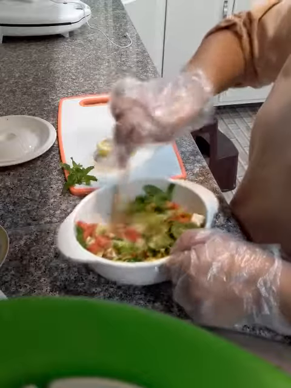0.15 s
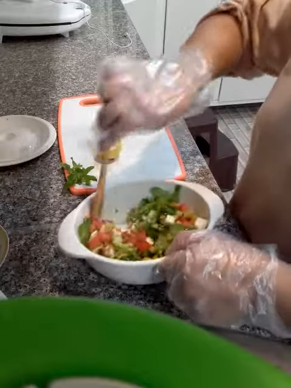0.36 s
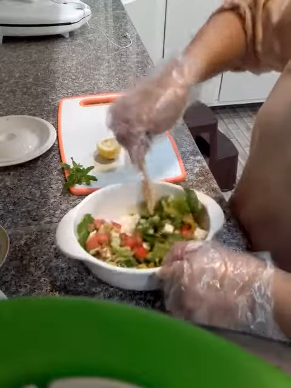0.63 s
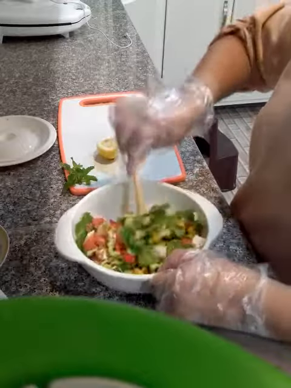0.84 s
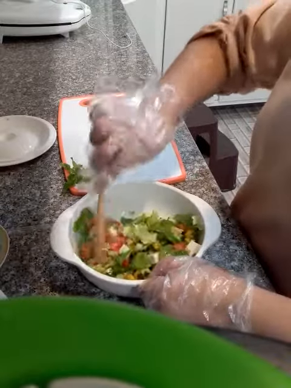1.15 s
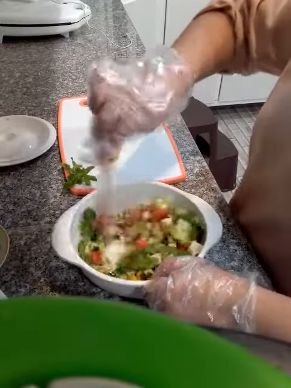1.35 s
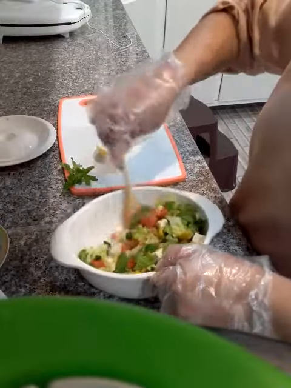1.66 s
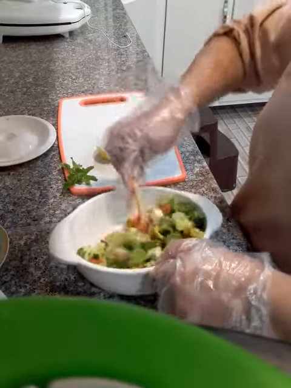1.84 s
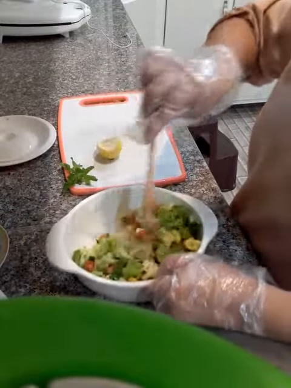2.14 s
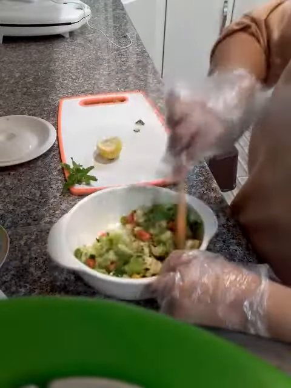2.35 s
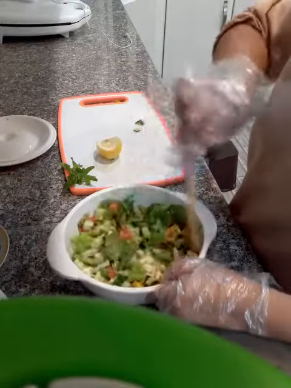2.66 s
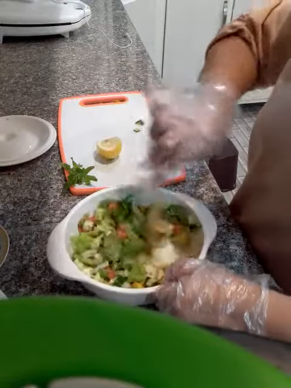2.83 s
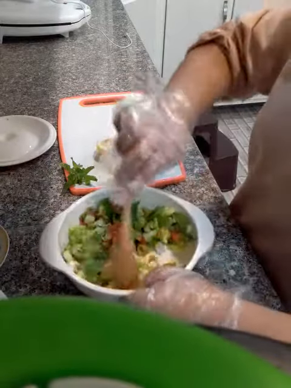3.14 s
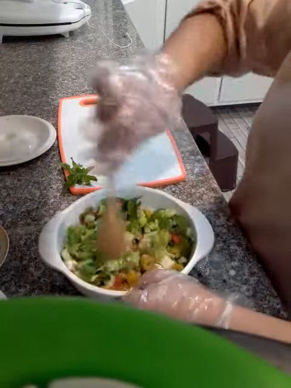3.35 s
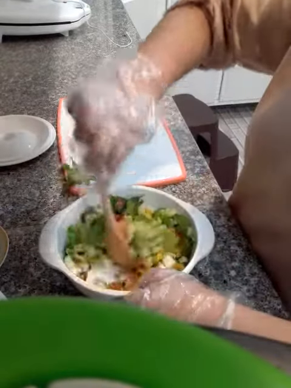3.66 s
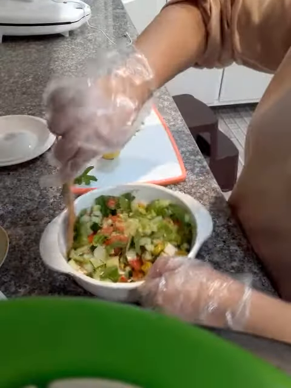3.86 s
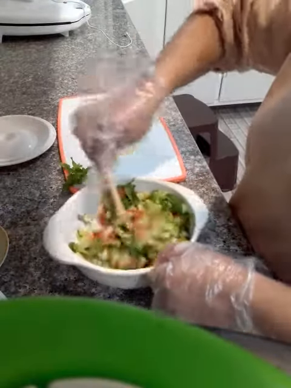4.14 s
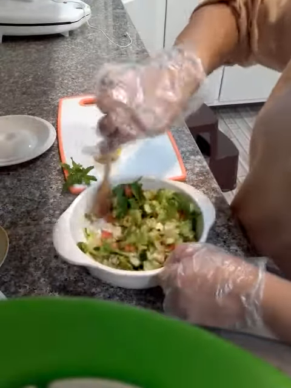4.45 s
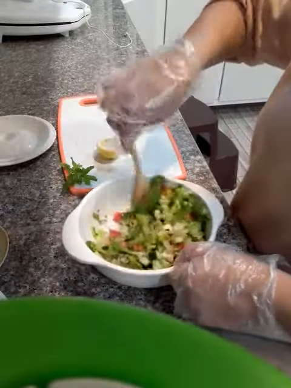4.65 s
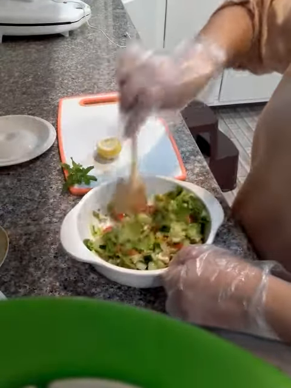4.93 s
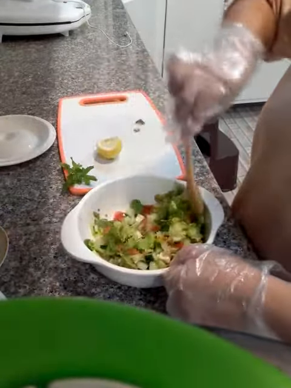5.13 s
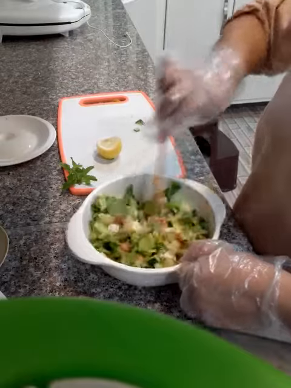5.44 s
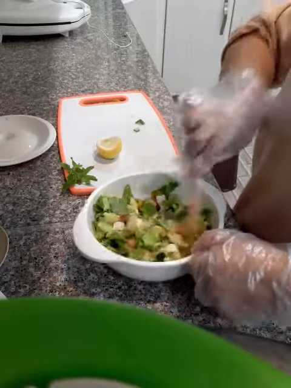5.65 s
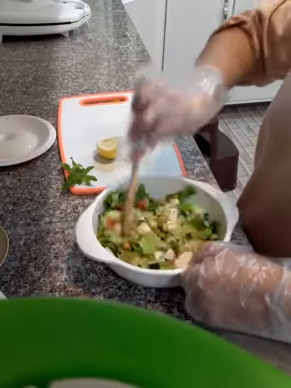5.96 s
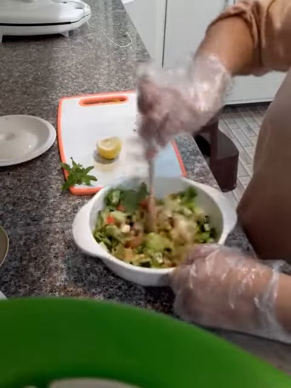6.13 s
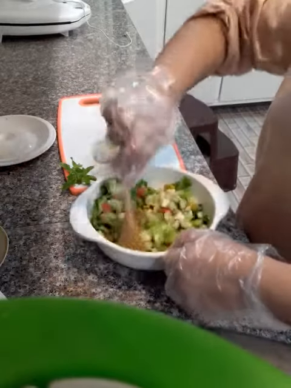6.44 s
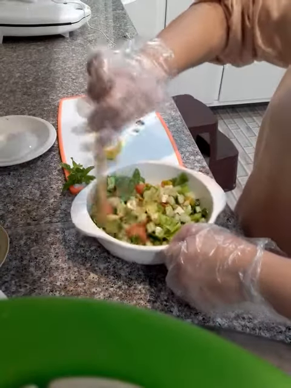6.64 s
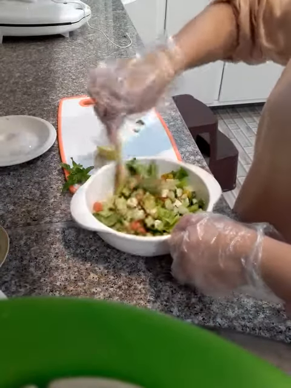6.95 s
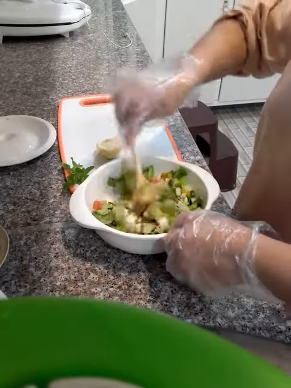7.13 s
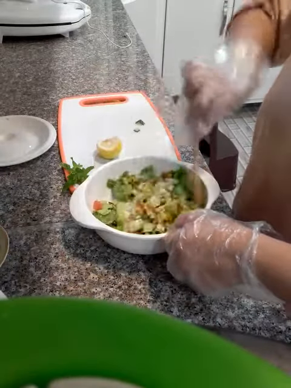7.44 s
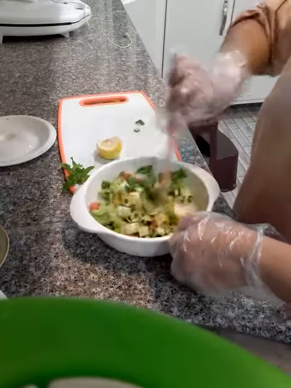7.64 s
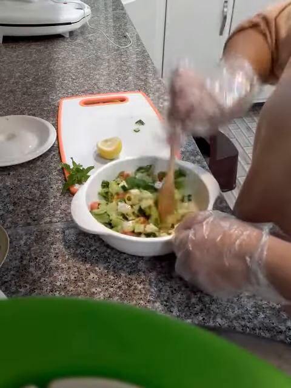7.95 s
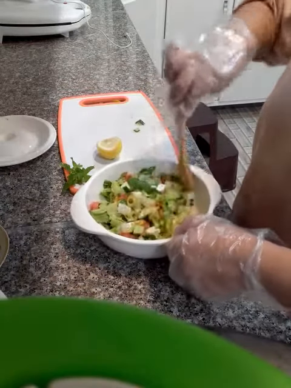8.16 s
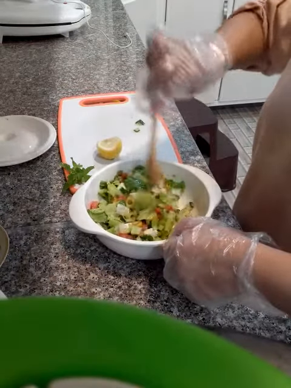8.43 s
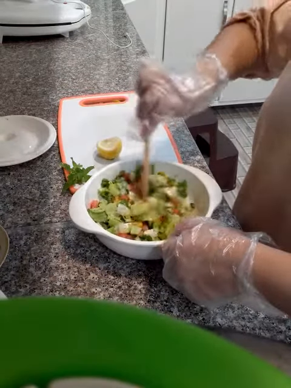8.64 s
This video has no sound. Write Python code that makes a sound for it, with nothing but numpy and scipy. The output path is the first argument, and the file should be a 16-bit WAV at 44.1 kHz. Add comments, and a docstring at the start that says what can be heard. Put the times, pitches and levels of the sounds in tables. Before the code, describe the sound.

Close up in a quiet, lightly reverberant kitchen, a wooden spoon tosses wet salad in a bowl. Short uneven strokes bring damp leaf crackle and low rubbing along the bottom, often beginning with a hard woody clack on the bare wall. Duller knocks come through the salad, clustering around two and a half seconds and near six and eight. Thin plastic gloves snap, and the bowl occasionally booms softly on the counter.

```python
"""Tossing salad in a bowl

A wooden spoon tosses dressed salad in a bowl on a stone kitchen counter. It clacks on the bare wall,
knocks dully through the salad (noise cracks plus decaying bowl modes) and rubs along the bottom (clumped
grains). Wet leaves and plastic gloves crackle and snap (shaped noise), wet wood sings along the wall
(narrow noise), the bowl booms on the counter, and a decaying noise tail makes the room answer."""
import sys
import numpy as np
from scipy import signal
from scipy.fft import rfft, irfft, next_fast_len
from scipy.io import wavfile
from scipy.ndimage import uniform_filter1d, map_coordinates

SR = 44100
rng = np.random.default_rng(int(sys.argv[2]) if len(sys.argv) > 2 else 0)


def store_wav(level_fs):
    """Save 16-bit WAV to argv[1]."""
    pcm = np.round(np.clip(np.atleast_2d(level_fs), -1, 1) * 32767)
    wavfile.write(sys.argv[1], SR, pcm.T.astype(np.int16))


N = 387638
BLOW_SIZE = SR * 3 // 4  # samples kept per blow, with its room tail


def amp(db):
    """Amplitude ratio of a level in dB."""
    return 10 ** (np.asarray(db) / 20)


def unit(x):
    """x at rms 1."""
    return x / np.sqrt(np.mean(x ** 2) + 1e-20)


def along(points, hz):
    """Interpolate (Hz, value) points on a log frequency axis."""
    f, v = np.transpose(points)
    return np.interp(np.log(hz + 1), np.log(f + 1), v)


def filtered(x, response):
    """x times a zero-phase response, a function of Hz."""
    m = next_fast_len(len(x) + 8192)
    spectrum = rfft(x, m) * response(np.fft.rfftfreq(m, 1 / SR))
    return irfft(spectrum, m)[:len(x)]


def coloured(x, spectrum):
    """x weighted by a (Hz, dB) spectrum, at rms 1."""
    return unit(filtered(x, lambda f: amp(along(spectrum, f))))


def bell(f, hz, width):
    """Gaussian bell on a log frequency axis; width is relative to its pitch."""
    return np.exp(-(np.log((f + 1) / hz) / width) ** 2)


def narrow(size, hz, width):
    """Noise of rms 1 in one resonance."""
    return unit(filtered(rng.standard_normal(size), lambda f: bell(f, hz, width)))


def favoured(blow, hz, boost_db, width):
    """The place of contact drives the modes around one pitch harder than the rest."""
    return filtered(blow, lambda f: amp(boost_db * bell(f, hz, width)))


def add(track, s, sound):
    """Mix a sound in at s seconds."""
    part = track[max(round(s * SR), 0):][:len(sound)]
    part += sound[:len(part)]


def wobble(rate):
    """A smooth random curve, rate knots a second."""
    knots = rng.standard_normal(int(N * rate / SR) + 4)
    return map_coordinates(knots, [np.arange(N) * rate / SR])


# Late decay of the room. Each row: frequency in Hz, t60 in s.
ROOM_DECAY = [(120, 0.38), (500, 0.24), (1000, 0.4), (2500, 0.58), (5000, 0.54), (9000, 0.35), (15000, 0.1)]


def kitchen(x, early_db, late_db, early_t60=0.17, build=0.0023):
    """Counter and cupboards answer within milliseconds, the whole room rings on; times in s."""
    hz, when, z = signal.stft(rng.standard_normal(BLOW_SIZE), SR, nperseg=256)
    decay = amp(-60 * when / along(ROOM_DECAY, hz)[:, None])
    late = signal.istft(z * decay, SR, nperseg=256)[1][:BLOW_SIZE]
    t = np.arange(BLOW_SIZE) / SR
    early = rng.standard_normal(BLOW_SIZE) * amp(-60 * t / early_t60)
    arriving = 1 - np.exp(-t / build)
    answer = amp(early_db) * unit(early * arriving) + amp(late_db) * unit(late * arriving)
    return x + signal.fftconvolve(x, answer / np.sqrt(BLOW_SIZE))[:len(x)]


# Still kitchen air. Each row: frequency in Hz, relative spectral level in dB.
AIR_SPECTRUM = [(20, 1.5), (35, -74), (60, -18), (130, 2), (220, -0.5), (400, -3), (850, 0.5), (1400, -8.5),
                (2900, -19), (11000, -21.5), (15800, -18)]


def hush():
    """Steady noise with the spectrum of the still kitchen."""
    return amp(-63.5) * coloured(rng.standard_normal(N), AIR_SPECTRUM)


def grains(rate, spread_db, clump_db, clump_rate):
    """Random tiny impulses, mostly weak, arriving in clumps; rates per second."""
    size_db = spread_db * np.minimum(rng.standard_exponential(N), 4) + clump_db * wobble(clump_rate)
    return (rng.random(N) < rate / SR) * amp(size_db) * rng.standard_normal(N)


def effort(rise, length, sag_db_per_s, fall_db_per_s, t):
    """One stroke at times t after its start: builds, sags as the salad gives way, dies as the spoon lifts."""
    sag_db = sag_db_per_s * np.maximum(t - rise, 0)
    fall_db = fall_db_per_s * np.maximum(t - length, 0)
    return np.clip(t / rise, 0, 1) * amp(-sag_db - fall_db)


# Leaves and glove film. Each row: frequency in Hz, relative spectral level in dB.
LEAF_SPECTRUM = [(500, -10), (1200, 7), (2000, 1.5), (3200, 0.5), (4600, -1), (6000, -2.5), (8000, -5),
                 (11500, -5), (15800, -13)]


def snap(hz, t60=0.022, boost_db=11, width=0.13):
    """A leaf breaks or a fold of film flips: a brief crackle around a pitch of its own."""
    t = np.arange(SR // 30) / SR
    crackle = rng.standard_normal(len(t)) * amp(2.1 * rng.standard_normal(len(t)))
    fade = amp(-60 * t / t60) * (1 - np.exp(-t / 0.00051))
    return fade * unit(favoured(coloured(crackle, LEAF_SPECTRUM), hz, boost_db, width))


FLICKS_PER_S, FLICK_HZ, FLICK_SPREAD_DB = 40, 7000, 7.5


def flicks():
    """Many small snaps at random times, each with its own size and pitch, up to an octave off centre."""
    track = np.zeros(N)
    for when, size, pitch in rng.uniform(-1, 1, (int(FLICKS_PER_S * N / SR), 3)):
        flick = snap(FLICK_HZ * 2 ** pitch, t60=0.014, boost_db=8.5)
        add(track, abs(when) * N / SR, amp(FLICK_SPREAD_DB * size) * flick)
    return unit(track)


# Spoon on the bottom. Each row: frequency in Hz, relative spectral level in dB.
RUB_SPECTRUM = [(50, -97), (90, -9), (135, 0.5), (220, -2), (320, 3.5), (450, 0), (620, 6), (900, 6),
                (1150, -4.5), (1400, -7.5), (2200, -8), (5000, -40)]
# Strokes through the salad. Each row: start in seconds, rise in s, length in s,
# relative crackle of leaves in dB, relative rub on the bottom in dB.
STROKES = [(0.069, .02, 0.16, -60, -50.5), (0.436, 0.018, 0.56, -60, -49), (1.124, 0.16, 0.14, -60, -44),
           (1.508, 0.023, 0.56, -60.5, -53), (2.33, .17, 0.15, -63, -49), (2.466, 0.014, .22, -66, -45.5),
           (2.732, .02, 0.23, -61.5, -47.5), (3.044, 0.062, 0.19, -63.5, -55),
           (3.505, 0.018, 0.18, -63, -49.5), (3.846, 0.026, 0.45, -61, -52),
           (4.437, 0.054, 0.33, -61, -51.5), (4.876, .13, 0.15, -66, -58), (5.161, 0.11, .19, -62, -53.5),
           (5.493, 0.024, 0.054, -68.5, -60), (5.62, 0.023, 0.31, -60.5, -50),
           (5.982, 0.098, 0.16, -60.5, -49), (6.209, 0.19, 0.27, -58.5, -43.5),
           (6.705, 0.096, 0.36, -62, -53), (7.437, .01, .16, -60.5, -50), (7.788, .02, 0.54, -59.5, -54),
           (8.574, 0.057, 0.11, -69.5, -65.5)]
CRACKLE_SAG_DB_PER_S, CRACKLE_FALL_DB_PER_S = 15.5, 113  # leaves give way during a stroke, then settle
RUB_SAG_DB_PER_S, RUB_FALL_DB_PER_S = 6.5, 88  # the pressure eases, then the spoon lifts
IDLE_CRACKLE_DB, IDLE_RUB_DB = -80, -76.5  # between strokes, on the scale of STROKES


def stirring():
    """With each stroke the spoon slips along the bottom; wet leaves and glove film crackle and flick."""
    press_power, toss_power, t = np.zeros(N), np.zeros(N), np.arange(SR) / SR
    for s, rise, length, crackle_db, rub_db in STROKES:
        push = effort(rise, length, RUB_SAG_DB_PER_S, RUB_FALL_DB_PER_S, t)
        stir = effort(rise, length, CRACKLE_SAG_DB_PER_S, CRACKLE_FALL_DB_PER_S, t)
        add(press_power, s, (amp(rub_db) * push) ** 2)
        add(toss_power, s, (amp(crackle_db) * stir) ** 2)
    press = np.hypot(np.sqrt(press_power), amp(IDLE_RUB_DB))
    toss = np.hypot(np.sqrt(toss_power), amp(IDLE_CRACKLE_DB))
    slips = grains(rate=1200, spread_db=1.5, clump_db=3.0, clump_rate=82)
    rub = amp(-7.5) * press * coloured(slips, RUB_SPECTRUM)
    crackle = grains(rate=2500, spread_db=4, clump_db=3.2, clump_rate=160)
    leaves = toss * (amp(3.0) * coloured(crackle, LEAF_SPECTRUM) + amp(-1) * flicks())
    return kitchen(rub + leaves, early_db=-2, late_db=-7.5, early_t60=0.18)


# Modes of the loaded bowl. Each row: nominal frequency in Hz, nominal level in dB, undamped t60 in s.
BOWL_MODES = [(139, -20, 0.11), (242, -17, 0.042), (305, -11.5, 0.12), (423.5, -13, 0.073),
              (572.7, -9, 0.12), (614.4, -4.5, 0.13), (674, -25.5, 0.011), (851.2, 9, 0.041),
              (909, 5, 0.072), (995, 12, 0.017), (1069.6, 1.5, 0.075), (1130, 2.5, 0.036),
              (1491, 8.5, 0.036), (1636, -0.5, 0.066), (1782, 1, 0.039), (1940, 10, 0.015),
              (1999, -17, 0.17), (2448, -13.5, 0.029), (2560, 20, 0.0072), (2800, -31, 0.064),
              (3450, -4.5, 0.017), (3683, -8, 0.063), (4596, 6, 0.0076), (5210, -3, 0.012),
              (5940, -61, 0.024), (6860, -14, 0.026)]
# Crack of wood on the bowl. Each row: frequency in Hz, relative spectral level in dB.
CRACK_SPECTRUM = [(60, -18), (250, -29), (600, 14.5), (1000, 1.5), (2200, 7.5), (3800, 0), (5100, -4),
                  (6200, -4.5), (7600, -10), (9500, -23.5), (16000, -34)]


def strike(crack_db, crack_t60, attack, damping, shift=0.0082):
    """One blow: a noise crack and the bowl's modes, each a little off in pitch and level by chance."""
    t = np.arange(SR // 10) / SR
    hz, db, t60 = np.transpose(BOWL_MODES)[:, :, None]
    hz = hz * (1 + shift * rng.standard_normal(hz.shape))
    db = db + rng.normal(0, 1.5, hz.shape)
    phase = rng.uniform(0, 2 * np.pi, hz.shape)
    modes = np.sum(amp(db - 60 * damping * t / t60) * np.sin(2 * np.pi * hz * t + phase), axis=0)
    crack = coloured(rng.standard_normal(len(t)), CRACK_SPECTRUM) * amp(crack_db - 60 * t / crack_t60)
    onset = 1 - np.exp(-(t / attack) ** 2)
    return np.pad((modes + crack) * onset, (0, BLOW_SIZE - len(t)))


# Valleys between the bowl's resonances. Each row: frequency in Hz, gain in dB.
VALLEYS = [(240, -17), (485, -5), (750, -9.5), (1330, -2), (3150, 0), (4250, -5), (5100, -7)]


def hollowed(blow, width=.055):
    """The bowl radiates little between its resonances."""
    return filtered(blow, lambda f: amp(sum(db * bell(f, hz, width) for hz, db in VALLEYS)))


def registers(base_db, per_weight, per_hardness, weight_db, hardness_db):
    """Level of each register in dB: weight mostly fills the low ones, a hard contact the high ones."""
    return np.array(base_db) + weight_db * np.array(per_weight) + hardness_db * np.array(per_hardness)


# Edges of thud, body, knock, clack and tick, in Hz.
REGISTER_EDGES_HZ = [100, 400, 750, 1300, 4000, 16000]


def voiced(blow, register_db):
    """Share the blow's strength among five registers, each levelled by its first 30 ms."""
    out = np.zeros(len(blow))
    for lo, hi, db in zip(REGISTER_EDGES_HZ, REGISTER_EDGES_HZ[1:], register_db):
        band = signal.butter(4, [lo, hi], 'band', fs=SR, output='sos')
        part = signal.sosfilt(band, blow)
        out += amp(db) * part / np.std(part[:SR // 33])
    return out


def ring(hz, t60, width, swell, head_db, head_t60):
    """A favoured mode: a decaying sine at first, then a lingering, wavering tone of narrow noise."""
    t = np.arange(BLOW_SIZE) / SR
    tone = narrow(BLOW_SIZE, hz, width)
    tone /= np.sqrt(np.abs(uniform_filter1d(tone ** 2, SR // 25)) + .1)  # even out the noise's swells
    head = amp(head_db - 60 * t / head_t60) * np.sin(2 * np.pi * hz * t)
    return (head + tone * amp(-60 * t / t60)) * (1 - np.exp(-t / swell))


# Spoon on the bare wall. Each row: start in seconds, level in dB, ring in Hz, relative ring level in dB,
# weight of salad behind the wall in dB, sharpness of the edge in dB.
TAPS = [(0.086, -25.5, 1106, -3.5, 8.5, -12), (0.459, -34.5, 1720, -18, 7.5, -16),
        (1.499, -24.5, 3400, -10.5, 1.5, -10), (2.741, -28, 880, -8, 1, -6.5),
        (3.509, -35, 2780, -16, 5, -30), (3.857, -26.5, 2007, -2, -6, -10), (4.459, -28.5, 575, -8, 5, -8),
        (5.634, -31.5, 2860, -12, -3, -15), (6.382, -27, 2780, -4.5, 2, -7.5),
        (7.442, -27, 2420, -15, -1, -5.5), (7.818, -27, 876, -8, 3.5, -7.5),
        (8.179, -29, 1414, -15, 7, -25)]
# Registers of a tap, thud to tick: base in dB, growth with weight and with edge in dB per dB.
TAP_BASE_DB = [-27.5, -15.5, -10, -1.5, -2.3]
TAP_DB_PER_WEIGHT_DB = [0.66, 1, 0.05, 0, 0.12]
TAP_DB_PER_EDGE_DB = [0, 0.13, 0.028, 0.18, 1]
RING_T60_AT_0DB_WEIGHT_S, RING_DAMPING = 0.37, 0.29  # dB of ring time lost per dB of weight
WALL_HZ = 2040  # every tap drives the bare wall harder here
MUFFLE_HZ, MUFFLE = 3570, 0.72  # weight mutes the upper modes around here, dB per dB


def taps(count=3):
    """Hard clacks: the spoon chatters on the wall, a few contacts within milliseconds, and the wall rings."""
    track = np.zeros(N)
    for s, db, ring_hz, ring_db, weight_db, edge_db in TAPS:
        chatter = np.zeros(BLOW_SIZE)
        for k in range(count):
            contact = strike(crack_db=8.0, crack_t60=0.042, attack=0.0014, damping=1.16)
            heard = kitchen(contact, early_db=-12, late_db=-6.0, early_t60=0.44)
            add(chatter, k * .0014, amp(-1.5 * k) * heard)
        chatter = favoured(chatter, ring_hz, boost_db=9.5, width=0.057)
        chatter = favoured(chatter, WALL_HZ, boost_db=2.5, width=0.074)
        chatter = favoured(chatter, MUFFLE_HZ, -MUFFLE * weight_db, width=.25)
        register_db = registers(TAP_BASE_DB, TAP_DB_PER_WEIGHT_DB, TAP_DB_PER_EDGE_DB, weight_db, edge_db)
        clack = voiced(hollowed(chatter), register_db)
        t60 = RING_T60_AT_0DB_WEIGHT_S * amp(-RING_DAMPING * weight_db)
        width = 0.026 * amp(-.7 * ring_db)  # a freely ringing wall sounds purer than a damped one
        tone = amp(ring_db + 1) * ring(ring_hz, t60, width, swell=0.00043, head_db=0, head_t60=0.032)
        add(track, s, amp(db) * (clack + tone))
    return track


# Snaps of leaf and glove film. Each row: start in seconds, relative level in dB, pitch in Hz.
SNAPS = [(0.5342, -31.5, 6060), (0.5989, -39, 6070), (0.765, -35.5, 7240), (0.8605, -40, 3260),
         (0.9905, -47, 5690), (1.2268, -39, 4890), (3.046, -41, 2680), (3.8211, -48, 10000),
         (4.0505, -35, 2800), (4.142, -37.5, 6580), (4.2383, -45, 3530), (4.255, -47, 3620),
         (4.7084, -38, 6770), (5.301, -32.5, 5230), (5.3138, -43, 4370), (6.178, -44, 5670),
         (6.5935, -39, 2820), (8.2781, -38, 2790)]


def snaps():
    """The crispest leaves and folds stand out from the rustle."""
    track = np.zeros(N)
    for s, db, hz in SNAPS:
        add(track, s, amp(db - 5) * snap(hz))
    return kitchen(track, early_db=-3.5, late_db=-19)


# Spoon sliding up the wet wall. Each row: middle in seconds, half the full span in s, pitch in Hz,
# level at the middle in dB.
SLIDES = [(0.746, 0.15, 1180, -51), (0.862, 0.062, 940, -50), (1.837, 0.26, 1010, -54),
          (2.618, 0.25, 1090, -49), (3.714, .07, 806, -54), (4.16, 0.078, 1080, -49),
          (4.246, .025, 1400, -51.5)]


def slides():
    """Wet wood slides along the wall and sings roughly in one resonance."""
    track = np.zeros(N)
    for s, length, hz, db in SLIDES:
        stroke = np.hanning(round(2 * length * SR)) ** 2
        add(track, s - length, amp(db) * stroke * narrow(len(stroke), hz, width=0.26))
    return track


# Blows cushioned by salad. Each row: start in seconds, level in dB, ring in Hz, relative ring level in dB,
# weight behind the spoon in dB, hardness of the contact in dB.
KNOCKS = [(0.726, -43.5, 1100, -19, -31, -3), (1.176, -58, 610, -16, 7.5, -5),
          (1.259, -41, 509, -1, -5, -20), (2.003, -35, 950, -6, -24, -17),
          (2.108, -36, 956, -8.5, -29, -22), (2.438, -56.5, 420, 1, -1, -5),
          (2.507, -37.5, 588, 3, -2.5, -2.5), (2.579, -46.5, 620, 14, 3, -7),
          (2.622, -33, 850, -12, -4, -7), (2.657, -34.5, 554, 4, -2, -5.5), (2.685, -42, 570, -15, -3, 3),
          (2.867, -30.5, 973, 5, -9, -0.5), (4.154, -46.5, 1110, -10, -22, -1),
          (4.368, -33.5, 412, 0, -3, -8), (4.898, -65, 570, -16, 6.5, 9), (5.3, -63.5, 303, -14, 9, 0),
          (5.765, -39.5, 420, -10, 1.5, -1), (5.776, -25.5, 620, 3, -6, -7.5),
          (5.785, -36, 997, 12.5, 6, 4.5), (6.099, -34.5, 940, -15, -18, -1),
          (6.737, -42, 963, -18, -20, -7.5), (6.807, -28, 972, -0.5, -10, -7),
          (7.044, -38, 534, 0, -3.5, -21), (7.17, -54.5, 535, -5, 3.5, -7.5),
          (7.806, -33.5, 895, -1, -7, -16), (7.924, -37, 910, -4, -5.5, -14),
          (7.961, -22, 942, -2, -4.5, 0.5)]
# Registers of a knock, thud to tick: base in dB, growth with weight and with hardness in dB per dB.
KNOCK_BASE_DB = [-9, -0.5, -3.14, -5.5, -15]
KNOCK_DB_PER_WEIGHT_DB = [0.4, 1, 0, 0.21, 0.12]
KNOCK_DB_PER_HARDNESS_DB = [0.17, 0.089, 0.025, 0.78, 0.84]


def knocks():
    """Dull blows through the salad: low-passed strikes with a ring."""
    track = np.zeros(N)
    for s, db, ring_hz, ring_db, weight_db, hardness_db in KNOCKS:
        blow = strike(crack_db=7.5, crack_t60=0.025, attack=0.0013, damping=1.48)
        soft = signal.sosfilt(signal.butter(1, 1500, fs=SR, output='sos'), blow)
        heard = kitchen(soft, early_db=-9.5, late_db=-6, early_t60=0.17)
        register_db = registers(KNOCK_BASE_DB, KNOCK_DB_PER_WEIGHT_DB, KNOCK_DB_PER_HARDNESS_DB,
                                weight_db, hardness_db)
        knock = voiced(hollowed(heard), register_db)
        tone = ring(ring_hz, t60=0.41, width=0.063, swell=.0027, head_db=13, head_t60=0.05)
        add(track, s, amp(db) * (knock + amp(ring_db - 6) * tone))
    return track


# Bowl rocking on the counter. Each row: start in seconds, level in dB.
BUMPS = [(1.258, -44), (2.869, -41), (4.371, -37), (5.3, -45.5), (5.779, -47), (7.927, -35.5)]


def bumps():
    """A heavy push rocks the loaded bowl, which booms briefly on the counter."""
    track = np.zeros(N)
    for s, db in BUMPS:
        boom = ring(hz=132.6, t60=0.18, width=0.15, swell=.005, head_db=-5, head_t60=0.17)
        add(track, s, amp(db) * boom)
    return track


def scene():
    """Spoon, bowl and salad over the hush of the kitchen."""
    return (hush() + stirring() + taps() + snaps() + slides() + knocks() + bumps())[None]


TOP_HZ = 15900


def record(dry):
    """The microphone keeps nothing above its band limit."""
    return filtered(dry[0], lambda f: f < TOP_HZ)[None]


dry = scene()
out = record(dry)
store_wav(out)
```